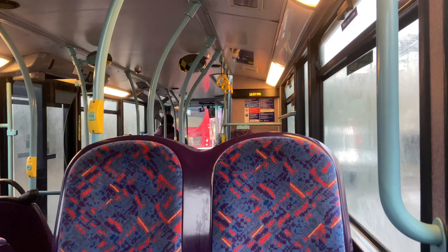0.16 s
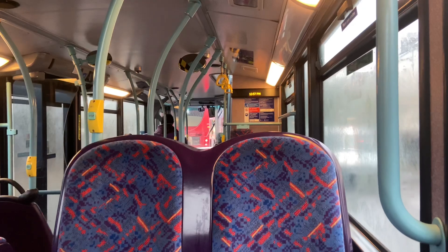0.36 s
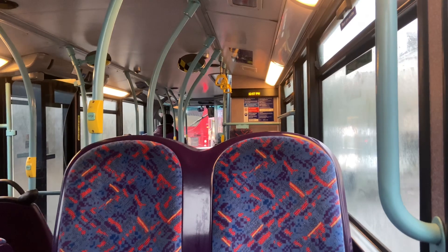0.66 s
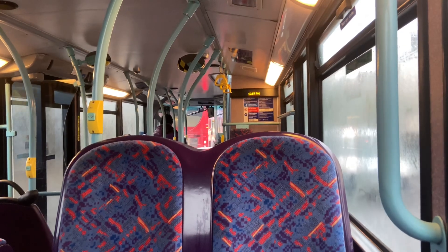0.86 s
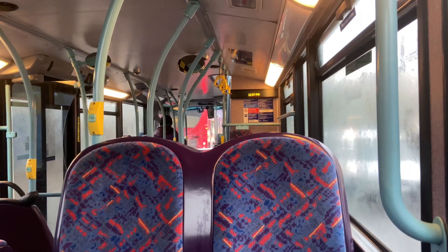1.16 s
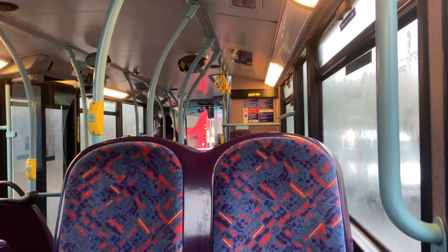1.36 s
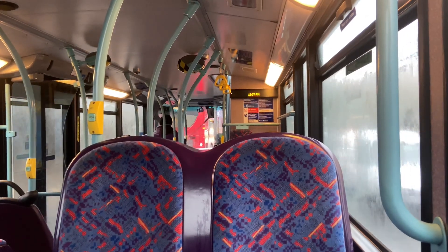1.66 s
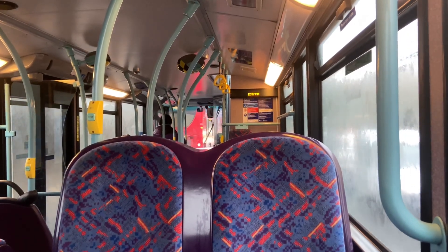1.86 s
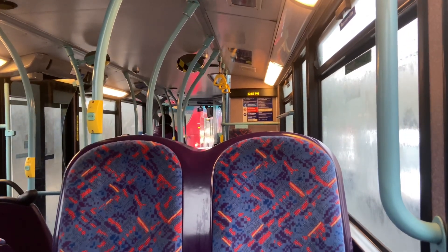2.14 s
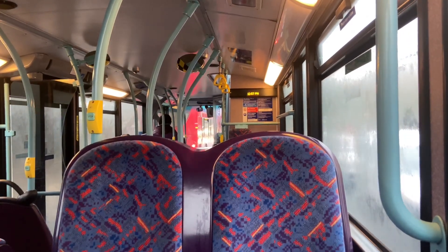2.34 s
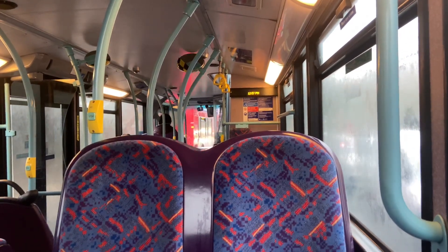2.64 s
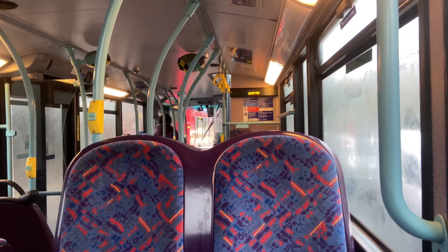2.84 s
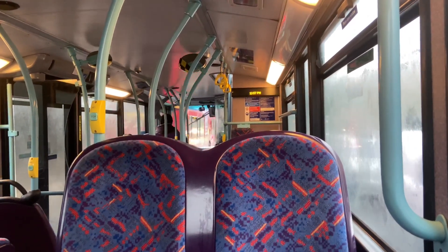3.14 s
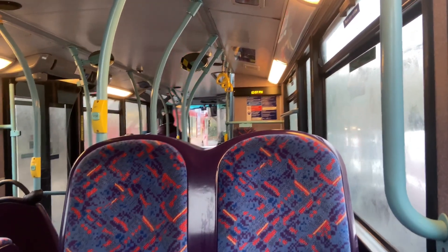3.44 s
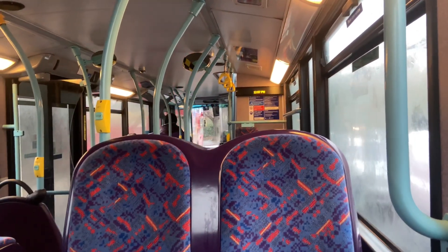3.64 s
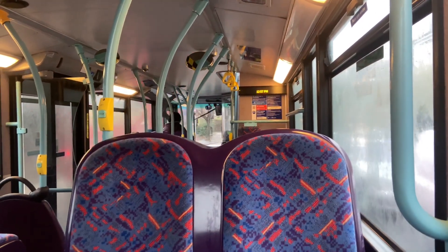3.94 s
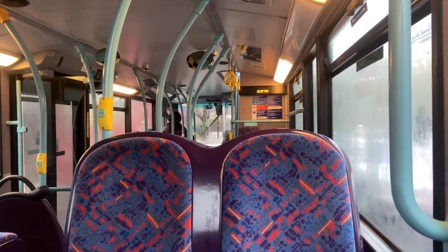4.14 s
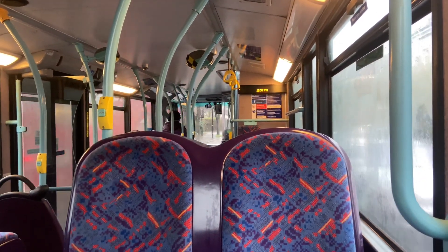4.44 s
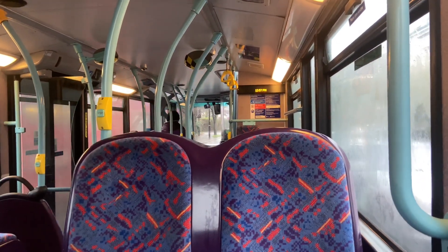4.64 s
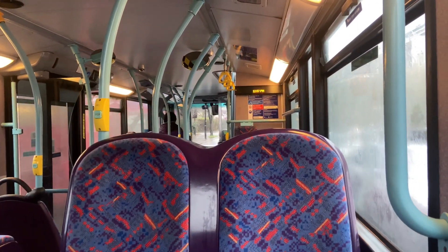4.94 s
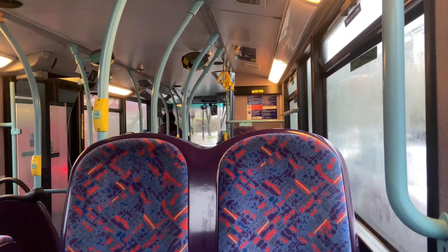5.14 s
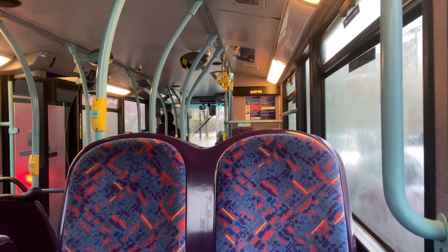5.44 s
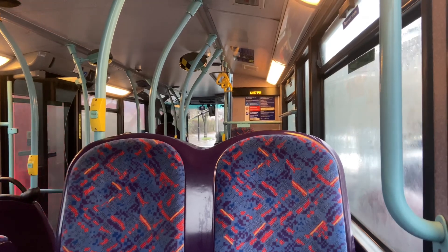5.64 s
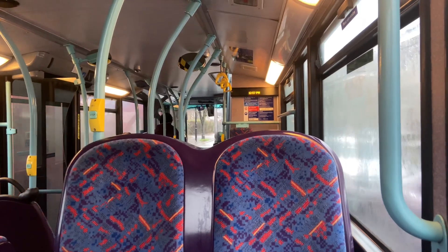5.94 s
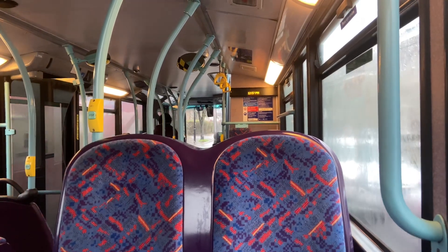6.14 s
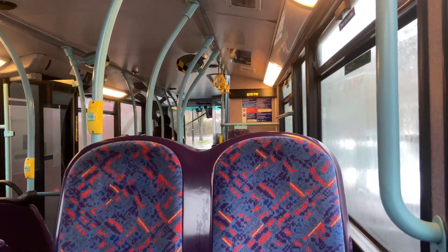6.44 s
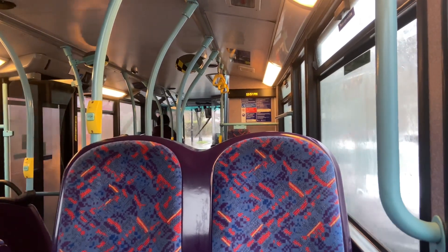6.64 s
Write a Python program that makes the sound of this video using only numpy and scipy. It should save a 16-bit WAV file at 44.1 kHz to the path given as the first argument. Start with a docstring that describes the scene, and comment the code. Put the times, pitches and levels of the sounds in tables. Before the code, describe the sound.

Inside a bus, a diesel engine idles with a low rumble and clatter, then pulls away, revs climbing through booming drones and a brief gear-change dip.

```python
"""Lower deck of a diesel bus. A six-cylinder engine settles to idle: crank orders, firing clatter, panel buzz,
rumble and a steady air hiss, all shaped noise or cosines locked to the crank; a faint turbo whistle falls early on.
At 2.8 s the pedal goes down: the revs climb, and the orders boom and fade through the fixed modes of the deck.
From 4 s gear tones sing briefly. Near 5.9 s the revs dip at a gear change, with a second falling whistle;
loose trim chatters as the dip begins and again while the revs climb to the end."""
import sys
import numpy as np
from scipy import signal
from scipy.fft import rfft, irfft
from scipy.io import wavfile
from scipy.ndimage import uniform_filter1d

SR = 44100
rng = np.random.default_rng(int(sys.argv[2]) if len(sys.argv) > 2 else 0)


def materialize(psi):
    """Save the field psi as 16-bit PCM at rate SR to the path in sys.argv[1].

    A 1-D psi becomes a single channel; in a 2-D psi each row is a channel.
    """
    bounded = np.clip(np.atleast_2d(psi).T, -1, 1)
    quanta = np.round(bounded * 32767).astype(np.int16)
    wavfile.write(sys.argv[1], SR, quanta)


N = 299439
TIME_S = np.arange(N) / SR
FREQ_HZ = np.maximum(np.arange(N // 2 + 1) * SR / N, 1)

# crank speed: time_s, turns_per_second_hz
CRANK_SPEED = [(0.0, 13.34), (1.0, 12.16), (1.35, 11.94), (1.7, 12.09), (2.84, 12.2), (3.0, 14.1),
               (3.1, 15.03), (3.25, 15.96), (3.45, 16.69), (3.8, 17.48), (3.95, 18.7), (4.25, 22.9),
               (4.5, 23.85), (4.8, 25.38), (5.2, 27.47), (5.5, 27.98), (5.75, 28.52), (6.02, 26.91),
               (6.33, 29.38), (6.56, 30.79), (6.79, 33.09)]
# driver's pedal: time_s, throttle (0-1)
PEDAL_THROTTLE = [(2.8, 0), (3.1, 0.89)]
START_TURNS = .85  # crank position in its two-turn cycle
CRUISE_HZ = 25  # reference crank speed of the pulling levels

# air hiss spectrum: pitch_hz, level_db
HISS_SPECTRUM = [(1000, -25.2), (3500, -4.1), (5700, -6.4), (7600, 0.4), (9100, -7.9), (10000, 0.6),
                 (11000, 3.1), (12200, -3.4), (13200, -10.4), (15500, -7.6)]
# turbocharger run-downs: start_s, length_s, start_hz, end_hz, level_db
TURBO_WHISTLES = [(.72, 0.5, 13100, 10600, -62), (5.831, 0.31, 7840, 7200, -49.5)]
# loose trim: peak_s, half_length_s, pitch_hz, level_db
TRIM_RATTLES = [(5.82, .05, 1050, -47), (6.42, .06, 1670, -41), (6.72, .035, 1380, -44),
                (6.75, .06, 1690, -44), (6.74, .08, 2450, -46)]
RATTLE_HALF_WIDTH = 0.038  # share of the pitch
# gear tones: peak_s, half_length_s, crank_multiple, level_db
GEAR_TONES = [(4.04, .06, 24, -39), (4.62, .17, 24.05, -37), (4.72, .1, 49.9, -46),
              (4.95, .2, 36.05, -42.5), (5.75, .2, 36.2, -46), (6.32, .14, 36.3, -42),
              (6.3, .14, 15.9, -39), (6.66, .15, 24, -41.5), (6.64, .13, 36.6, -42)]
WHINE_ROUGHNESS = .33  # spread of size, and of phase in rad

# low body sway spectrum: pitch_hz, level_db
SWAY_SPECTRUM = [(18, -52), (28, -33), (33, -10), (38, -10), (46, -18), (70, -25), (200, -83)]
# body sway level: time_s, level_db
SWAY_LEVEL = [(0.0, -39.5), (2.6, -25), (3.15, -29), (3.7, -29.5), (5.3, -29.5), (5.6, -41), (6.79, -32)]
# floor rumble spectrum: pitch_hz, level_db
RUMBLE_SPECTRUM = [(30, -29), (48, -18), (70, -1.5), (105, -3.5), (150, -7), (200, -10), (245, -10.5),
                   (295, -16.5), (345, -8), (420, -28), (600, -43), (1200, -76)]
# floor growl spectrum: pitch_hz, level_db
GROWL_SPECTRUM = [(250, -4), (380, 1), (450, 4), (560, -1), (680, -3.5), (800, -6), (950, -7.5),
                  (1400, -13), (3000, -65)]
# combustion clatter spectrum: pitch_hz, level_db
CLATTER_SPECTRUM = [(400, -22), (850, -3), (1020, -0.1), (1120, -1.5), (1260, 0.2), (1500, -3),
                    (1650, -2.5), (1850, -3.5), (2400, -4.5), (2650, -7), (2950, -9.5), (3700, -11.5),
                    (5500, -19.5), (9000, -24.5), (16000, -46)]
# buzzing panel spectrum: pitch_hz, level_db
BUZZ_SPECTRUM = [(400, -10), (530, -3), (610, -6), (665, -2.5), (725, -13), (770, -3), (810, -2), (840, -8),
                 (1050, -24.5), (1350, -17.5), (4000, -79)]
# panel buzz swell: time_s, gain_db
BUZZ_SWELL_DB = [(0, -1), (.8, 0.5), (1.6, 1), (2.3, -1), (3.2, -0.5), (4, 1)]
# strain on the engine: time_s, gain_db
STRAIN = [(0, 2), (1.6, -0.5), (2.7, 1.2), (3.25, -0.5), (4.05, 0.5), (4.75, 1.5), (5.5, -1), (6.25, 2.5),
          (6.79, 1.6)]
CLATTER_STRAIN_SHARE = 0.8
# noise levels by effort: idle_db, pull_db (full throttle at CRUISE_HZ), slope_db_per_hz
CLATTER_EFFORT = (-43, -41, 0.58)
# growl, same columns: idle_db, pull_db, slope_db_per_hz
GROWL_EFFORT = (-43, -34.5, 0.42)
# rumble, same columns: idle_db, pull_db, slope_db_per_hz
RUMBLE_EFFORT = (-28.8, -27.6, 0.1)
# buzz, same columns: idle_db, pull_db, slope_db_per_hz
BUZZ_EFFORT = (-38.5, -45.5, 0.06)

# body shaken by engine, pumps, gears: crank_multiple, idle_db, pull_db (at CRUISE_HZ), slope_db_per_hz
BODY_ORDERS = [(6.5, -36.9, -30.9, -0.5), (7.0, -30.4, -37.7, -1.3), (7.5, -27.3, -37.4, -0.4),
               (8.0, -23.3, -22.7, 0.2), (8.5, -42.3, -37.5, 1.3), (9.0, -23.2, -33.0, -0.4),
               (9.5, -41.5, -40.6, 0.2), (10.0, -27.4, -22.0, 0.5), (10.5, -38.2, -34.0, 0.6),
               (11.0, -40.8, -38.5, 0.9), (11.5, -32.2, -41.3, 0.7), (12.0, -24.4, -21.8, -0.2),
               (13.0, -38.4, -36.1, 0.7), (14.0, -24.7, -30.2, -0.2), (15.0, -38.2, -34.9, 0.7),
               (16.0, -23.5, -30.5, 0.4), (17.0, -39.4, -38.0, -0.1), (18.0, -31.1, -32.5, 0.7),
               (20.0, -38.6, -28.1, -0.3), (22.0, -36.0, -33.5, -0.3), (24.0, -32.3, -31.0, 0.1),
               (26.0, -32.2, -35.8, 0.4), (28.0, -29.8, -40.4, 0.4), (29.0, -36.2, -39.7, 0.3)]
# saloon air and panel resonances: pitch_hz, width_hz, level_db
SALOON_RESONANCES = [(90.8, 8.9, -4.2), (106.9, 4.7, -5.0), (131.0, 4.7, -3.5), (156, 5.5, -0.8),
                     (181, 6, -3.5), (195.3, 11.4, 3.5), (219.8, 9.7, -9.3), (247, 10, -3.5), (264, 8, -2),
                     (305.7, 8.4, -10.2), (332, 9, -6), (350.1, 10.8, -5.1), (366, 9, -7),
                     (437.9, 65.3, -13.4)]
# drone cancellations at the seat: pitch_hz, half_width_hz, depth_db
DRONE_NULLS = [(168.7, 2.3, -11.1), (212, 4, -2.5), (239.5, 4.3, -4.1), (285, 16, -11)]
# extra body shaking while the revs leap: time_s, gain_db
SURGE_GAIN = [(2.8, 0), (2.98, 1.5), (3.15, 0), (3.8, 0), (3.98, 2), (4.14, 3), (4.32, 0)]
# exhaust pulses (three a turn) and lope: crank_multiple, idle_db, pull_db (at CRUISE_HZ), slope_db_per_hz
EXHAUST_ORDERS = [(2.0, -31.4, -15.6, -0.5), (2.5, -33.2, -20.8, 2.0), (3.0, -2.9, -1.5, 1.2),
                  (3.5, -30.3, -13.6, 1.7), (4.0, -12.0, -9.6, 1.0), (4.5, -11.3, -12.2, 0.2),
                  (5.0, -19.8, -13.0, 0.2), (5.5, -19.5, -19.0, -0.5), (6.0, -10.0, -4.5, -0.5)]
# standing waves of the deck: pitch_hz, width_hz, level_db
DECK_MODES = [(37.1, 1.1, -24.1), (69.8, 4.6, -8.7), (78.0, 7.0, -16.8), (86.4, 8.5, -17.8),
              (96.3, 10.3, -12.8), (121.2, 10.3, -14.0), (144.7, 16.0, -19.4), (159.5, 5.0, -21.6),
              (194.3, 12.2, -5.3)]
# boom cancellations at the seat: pitch_hz, half_width_hz, depth_db
DECK_NULLS = [(74.9, 1.0, -10), (103.3, 2.5, -5.2), (169.1, 3.1, -11.6)]
# lope of unequal cylinders: time_s, gain_db
LOPE_GAIN = [(0.0, -11.3), (3.3, -2.1), (3.8, -0.7), (4.5, -3.7), (4.9, 3.0), (5.6, 0.0), (6.05, 1.8),
             (6.3, -0.1), (6.79, 2.0)]
# gain of all boom and drone orders: time_s, gain_db
TONE_GAIN = [(0, 1.5), (0.55, 1.5), (0.68, -1), (0.9, 1), (2.8, 0.6), (3, 1.5), (3.15, -0.5), (3.4, -0.3),
             (3.7, 1.0), (3.82, -2), (3.93, 3.5), (4.1, 0.8), (4.28, -0.5), (4.55, 2), (4.8, 0.3),
             (5.2, 0.6), (5.75, 2.0), (6.1, 0.8), (6.45, 0.8), (6.79, -2.2)]
IDLE_WAVER_DB, PULL_WAVER_DB = 1.7, .5
RING_UP_S = .05

# microphone ports: pitch_hz, likeness (0-1), left_phase_lead_rad, left_minus_right_db
PORT_FIELD = [(80, .995, -.48, -2.45), (200, .98, -.92, -3), (330, .8, -1.35, -2.6), (420, .3, -1.7, -.3),
              (600, .42, -3.5, 0), (1200, .5, -3.1, -1.6), (1700, .4, -1.4, -1.5), (3000, .2, -2, -1.6),
              (5000, .15, -1.5, -.6), (11000, .4, -1.4, -.6)]
TOP_HZ = 15700


def undb(db):
    """Decibels to gain."""
    return 10 ** (np.asarray(db) / 20)


def curves(table):
    """Each column of a time table, sample by sample."""
    s, *columns = np.transpose(table)
    return [np.interp(TIME_S, s, column) for column in columns]


def over_frequency(table):
    """Each column of a frequency table, bin by bin on a log axis."""
    hz, *columns = np.transpose(table)
    return [np.interp(np.log(FREQ_HZ), np.log(hz), column) for column in columns]


def walk(rate_hz):
    """Smooth random curve of spread 1, changing about rate_hz times a second."""
    spectrum = rfft(rng.standard_normal(N)) * np.exp(-(FREQ_HZ / rate_hz) ** 2)
    y = irfft(spectrum, N)
    return y / y.std()


def noise(colour, ripple_db):
    """Two unrelated noises of one colour, rms 1; a random ripple makes the spectrum slightly uneven."""
    points = N // 300
    ripple = np.interp(FREQ_HZ, np.linspace(0, SR / 2, points), rng.standard_normal(points))
    gain = undb(over_frequency(colour)[0] + ripple_db * ripple)
    y = irfft(rfft(rng.standard_normal((2, N))) * gain, N)
    return y / y.std()


def effort_db(hz, idle_db, pull_db, slope_db_per_hz):
    """Engine level: fixed at idle, following the revs as the throttle opens."""
    throttle = np.clip(curves(PEDAL_THROTTLE)[0], 0, 1)
    pulling_db = pull_db + slope_db_per_hz * (hz - CRUISE_HZ)
    return idle_db + throttle * (pulling_db - idle_db)


def cancellation(hz, nulls):
    """Gain of the dips where reflections cancel."""
    return undb(sum(db * np.exp(-((hz - f) / width) ** 2) for f, width, db in nulls))


def seat_gain(hz):
    """Deck modes add as complex waves, then reflections cancel some pitches at the seat."""
    waves = sum(undb(db) / (1 + 1j * (hz / f - f / hz) * f / width) for f, width, db in DECK_MODES)
    return np.abs(waves) * cancellation(hz, DECK_NULLS)


def rung_up(hz, response):
    """Gain of a gliding tone, smoothed over the time the deck takes to ring up and die away."""
    return uniform_filter1d(np.interp(hz, FREQ_HZ, response), int(RING_UP_S * SR))


def partial(turns, multiple, rough):
    """One crank order whose size and timing vary from one two-turn engine cycle to the next."""
    cycles = np.arange(0, turns[-1] + 2, 2)
    draws = rough * rng.standard_normal((2, N // 1000))[:, :len(cycles)]
    size, slip_rad = (np.interp(turns, cycles, draw) for draw in draws)
    return (1 + size) * np.cos(2 * np.pi * (multiple * turns + rng.random()) + slip_rad)


def air():
    """Steady fine hiss: coloured noise with a slight waver."""
    return noise(HISS_SPECTRUM, ripple_db=1.4) * undb(.35 * walk(8) - 49)


def turbo():
    """Thin sine whistle, falling as the turbine slows, its pitch unsteady separately on each side."""
    out = np.zeros((2, N))
    for start_s, length_s, start_hz, end_hz, level_db in TURBO_WHISTLES:
        age = np.clip((TIME_S - start_s) / length_s, 0, 1)
        swell = np.sin(np.pi * np.sqrt(age))
        for side in out:
            hz = start_hz + (end_hz - start_hz) * age + 60 * walk(128.0)
            side += undb(level_db) * swell * np.sin(2 * np.pi * np.cumsum(hz) / SR)
    return out


def rattles(turns):
    """Loose trim struck once a crank turn; each piece is noise ringing round its own pitch."""
    chatter = 0.48 + np.exp(-(turns % 1) / .3)
    out = 0
    for peak_s, half_s, pitch_hz, level_db in TRIM_RATTLES:
        resonance = 1 / (1 + ((FREQ_HZ / pitch_hz - 1) / RATTLE_HALF_WIDTH) ** 2)
        ring = irfft(rfft(rng.standard_normal((2, N))) * resonance, N)
        swell = np.exp(-((TIME_S - peak_s) / half_s) ** 2)
        out = out + undb(level_db) * swell * chatter * ring / ring.std()
    return out


def whine(turns):
    """Rough crank-locked gear tones swell briefly at panel resonances; left is later and softer."""
    right = 0
    for peak_s, half_s, multiple, level_db in GEAR_TONES:
        size = 1 + WHINE_ROUGHNESS * walk(40)
        slip_rad = WHINE_ROUGHNESS * walk(40)
        swell = np.exp(-((TIME_S - peak_s) / half_s) ** 2)
        right = right + undb(level_db) * swell * size * np.cos(2 * np.pi * multiple * turns + slip_rad)
    left = undb(-2) * np.interp(TIME_S - .00025, TIME_S, right)
    return np.array([left, right])


def engine_noise(turns, hz):
    """Each firing pulses clatter, growl and buzz by a random strength; rumble and sway run unpulsed."""
    strain_db, = curves(STRAIN)
    firing, since_firing = np.divmod(3 * turns, 1)  # three firings a turn
    strength = undb(3 * rng.standard_normal(N // 100))[firing.astype(int)]
    burst = 1 + 0.3 * strength * np.exp(-since_firing / 0.5)
    burst = burst / np.sqrt(np.mean(burst ** 2))

    clatter_db = effort_db(hz, *CLATTER_EFFORT) + CLATTER_STRAIN_SHARE * strain_db + 0.84 * walk(26)
    clatter = noise(CLATTER_SPECTRUM, ripple_db=1.3) * burst * undb(clatter_db)
    growl_db = effort_db(hz, *GROWL_EFFORT) + strain_db + 1.3 * walk(8)
    growl = noise(GROWL_SPECTRUM, ripple_db=2) * burst * undb(growl_db)
    buzz_db = effort_db(hz, *BUZZ_EFFORT) + curves(BUZZ_SWELL_DB)[0] + strain_db + 1.5 * walk(9)
    buzz = noise(BUZZ_SPECTRUM, ripple_db=1) * burst * undb(buzz_db)
    rumble_db = effort_db(hz, *RUMBLE_EFFORT) + strain_db + walk(12)
    rumble = noise(RUMBLE_SPECTRUM, ripple_db=.5) * undb(rumble_db)
    sway = noise(SWAY_SPECTRUM, ripple_db=0) * undb(curves(SWAY_LEVEL)[0])
    return clatter + growl + buzz + rumble + sway


def drone(turns, hz):
    """Higher orders swell and fade as they glide through saloon resonances, summed in power, and nulls."""
    power = sum(undb(db) ** 2 / (1 + ((FREQ_HZ / f - f / FREQ_HZ) * f / width) ** 2)
                for f, width, db in SALOON_RESONANCES)
    response = np.sqrt(power) * cancellation(FREQ_HZ, DRONE_NULLS)
    surge_db, = curves(SURGE_GAIN)
    out = 0
    for order, *effort in BODY_ORDERS:
        level_db = effort_db(hz, *effort) + surge_db + .7 * walk(4.4)
        gain = undb(level_db) * rung_up(order * hz, response)
        out = out + gain * partial(turns, order, rough=.11)
    return out


def boom(turns, hz):
    """Exhaust orders boom through the deck modes; the lope orders between them make a throb."""
    response = seat_gain(FREQ_HZ)
    waver_db = effort_db(hz, IDLE_WAVER_DB, PULL_WAVER_DB, 0)
    lope_db, = curves(LOPE_GAIN)
    out = 0
    for order, *effort in EXHAUST_ORDERS:
        is_lope = order % 3 != 0  # not a multiple of the firing rate
        level_db = effort_db(hz, *effort) + waver_db * walk(3.5) + (lope_db if is_lope else 0)
        gain = undb(level_db) * rung_up(order * hz, response)
        out = out + gain * partial(turns, order, rough=.14 if is_lope else .05)
    return out


def ports(pair):
    """Two unrelated fields reach the ports: long waves much alike at both, short ones less so."""
    likeness, lead_rad, tilt_db = over_frequency(PORT_FIELD)
    likeness = np.clip(likeness, 0, 1)
    edge = np.clip(np.minimum(TIME_S, TIME_S[-1] - TIME_S) / .006, 0, 1)  # 6 ms end fades
    a, b = rfft(pair * np.sin(np.pi / 2 * edge) ** 2)
    left = (likeness * a + np.sqrt(1 - likeness ** 2) * b) * np.exp(1j * lead_rad)
    return irfft(np.array([left * undb(tilt_db / 2), a * undb(-tilt_db / 2)]), N)


def scene():
    """The crank drives all engine layers; tones arrive as one wave, noises as two unrelated fields."""
    hz, = curves(CRANK_SPEED)
    turns = START_TURNS + np.cumsum(hz) / SR
    tone = (boom(turns, hz) + drone(turns, hz)) * undb(curves(TONE_GAIN)[0])
    tones = np.array([tone, np.zeros(N)])
    field = tones + engine_noise(turns, hz) + rattles(turns) + air() + turbo()
    return ports(field) + whine(turns)  # whine carries its own left-right offset


def record(dry):
    """Round the very highest peaks, then low-pass steeply at TOP_HZ."""
    rounded = dry / (1 + (dry / .95) ** 10) ** .1
    return signal.sosfilt(signal.ellip(8, .2, 80, TOP_HZ, fs=SR, output="sos"), rounded)


dry = scene()
out = record(dry)
materialize(out)
```